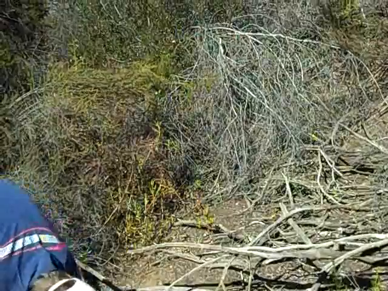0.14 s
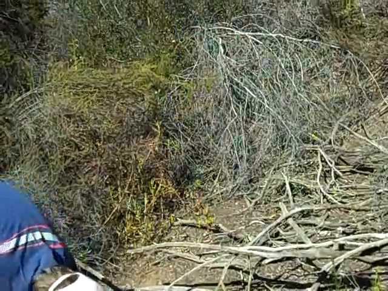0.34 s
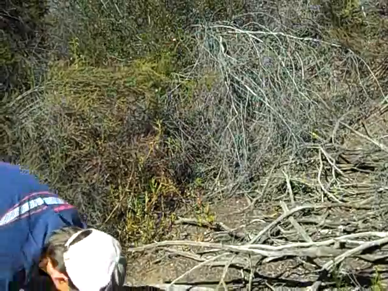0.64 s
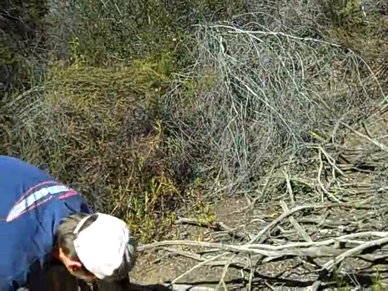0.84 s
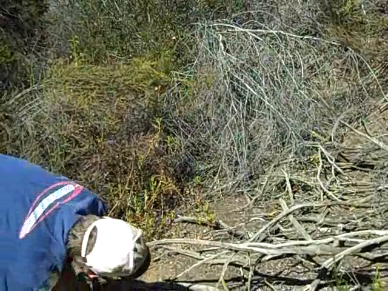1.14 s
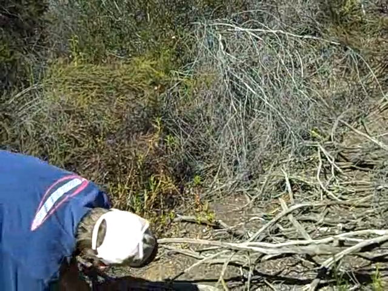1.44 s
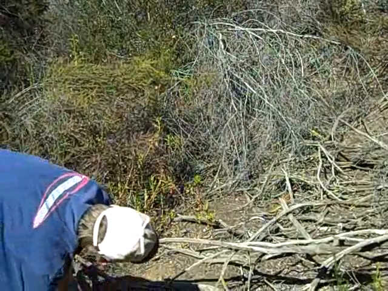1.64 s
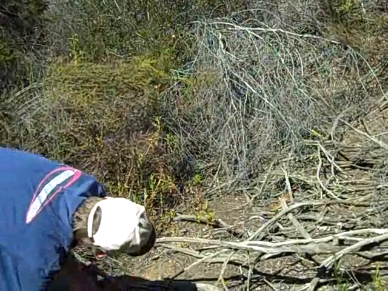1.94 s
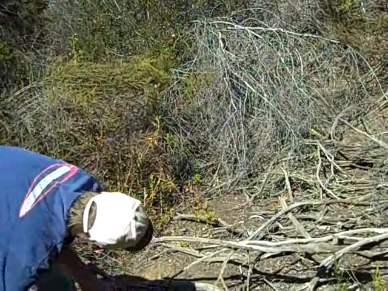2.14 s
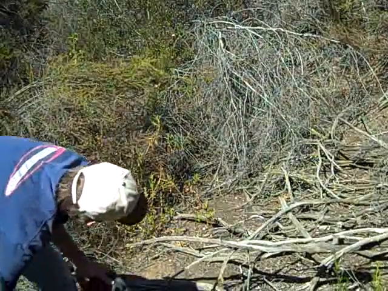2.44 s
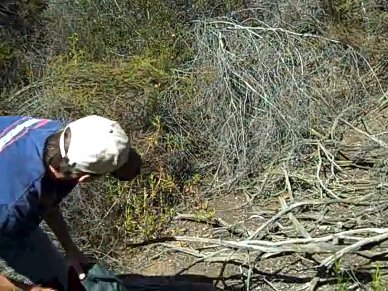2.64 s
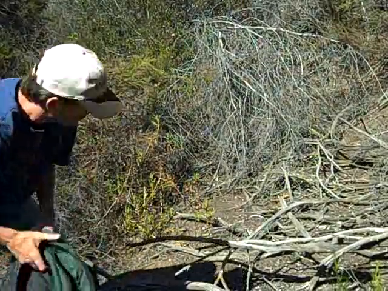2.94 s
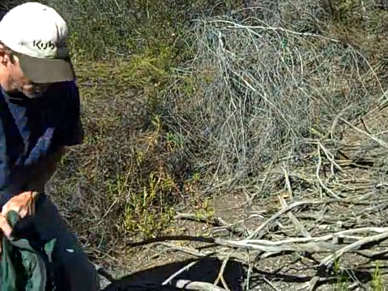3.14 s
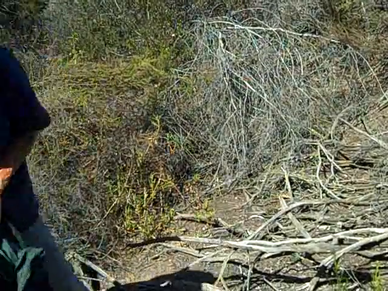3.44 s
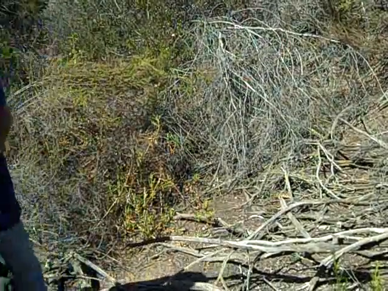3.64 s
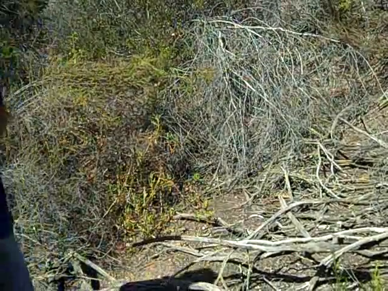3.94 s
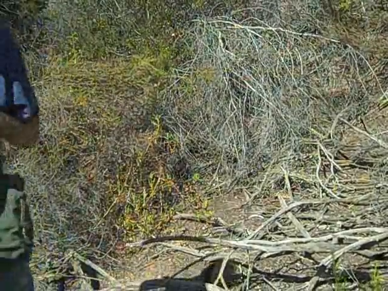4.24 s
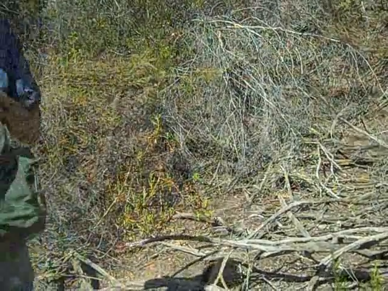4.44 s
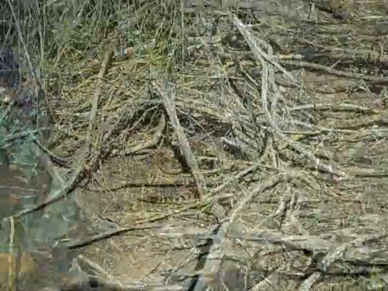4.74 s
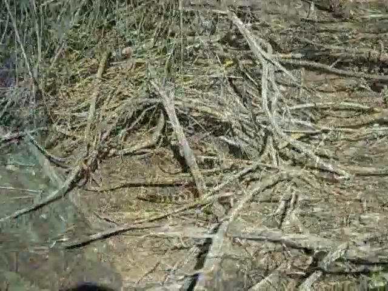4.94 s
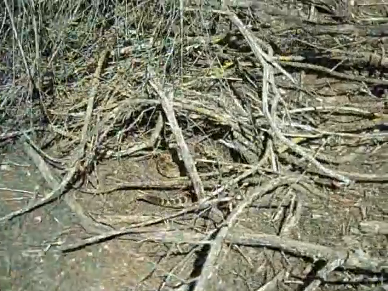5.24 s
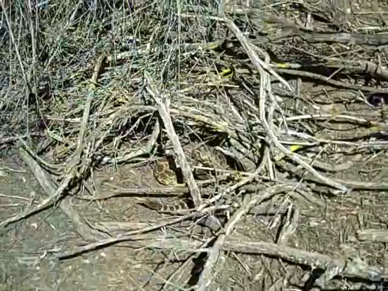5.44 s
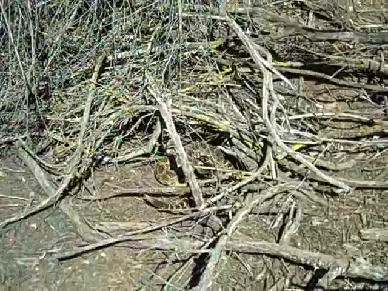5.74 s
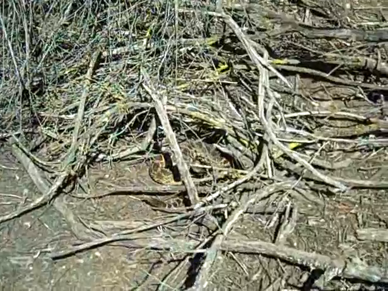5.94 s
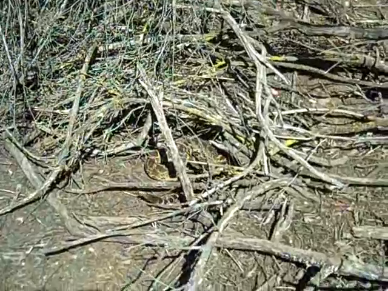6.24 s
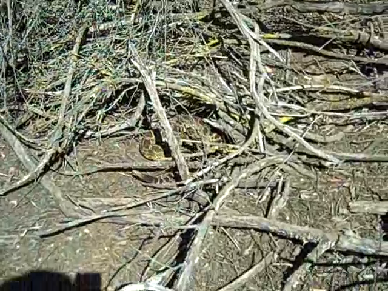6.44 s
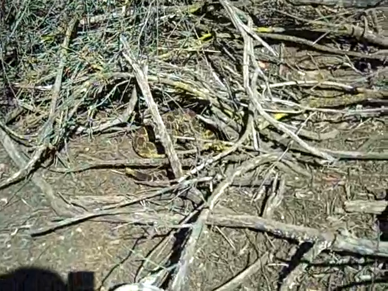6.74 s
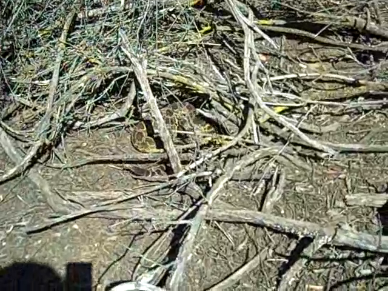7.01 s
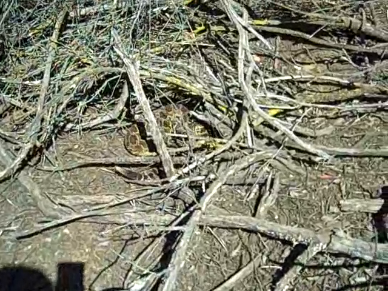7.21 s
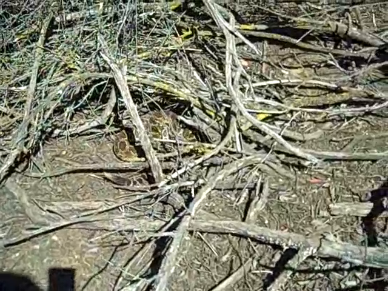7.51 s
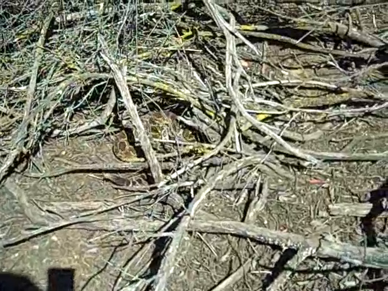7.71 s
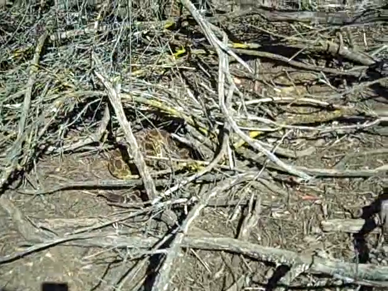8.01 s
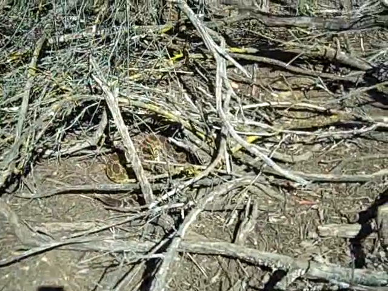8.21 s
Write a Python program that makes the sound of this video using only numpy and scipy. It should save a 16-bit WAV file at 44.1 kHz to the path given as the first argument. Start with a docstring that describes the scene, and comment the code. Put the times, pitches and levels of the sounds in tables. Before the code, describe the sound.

Continuous dry, high rattlesnake buzz outdoors, with scuffing feet, a hollow branch knock, and crackling twigs in the first half.

```python
"""Rattlesnake in dry scrub

A rattlesnake buzzes without pause under dead branches; halfway through, the microphone turns to face it.
At every swing of the tail the loose horny segments knock together: short runs of noise bursts, coloured by
the hollow segments. Someone close by shifts and steps back: litter scuffs in tiny grains, twigs snap in
noise and ringing modes, sticks and a branch knock, bark rasps and squeaks, all over faint outdoor air."""
import sys
import numpy as np
from scipy import signal
from scipy.fft import rfft, irfft
from scipy.io import wavfile

SR = 44100
rng = np.random.default_rng(int(sys.argv[2]) if len(sys.argv) > 2 else 0)


def log_audio(samples):
    """Write samples as a 16-bit WAV file to the path given in sys.argv[1]."""
    # one column per channel
    frames = np.atleast_2d(samples).T
    # limit to full scale, then quantise
    limited = np.clip(frames, -1, 1)
    pcm = np.round(limited * 32767).astype(np.int16)
    wavfile.write(sys.argv[1], SR, pcm)


N = 369116
TIME = np.arange(N) / SR

# outdoor air, outline of its spectral density: freq_hz, level_db (per Hz, relative)
AIR_COLOUR = [(20, 14), (50, -1.5), (120, -4), (300, -3.5), (700, -6), (1500, -7.5), (4000, 2), (13000, -6)]
# colour of the dry litter: freq_hz, level_db (relative)
LITTER_COLOUR = [(60, -18), (250, -11), (550, -2.5), (1400, -1.5), (2600, -3), (4500, -3.5), (12000, -22)]
# feet pressing and sliding in the litter: peak_s, level_db, rise_s, fall_s
FOOT_SCUFFS = [(1.19, -46.5, .025, 0.058), (1.52, -54, 0.17, .08), (1.815, -46, 0.063, 0.097),
               (2.03, -51.5, 0.12, 0.051), (3.4, -54.5, .3, 0.21), (3.58, -46.5, 0.066, 0.11),
               (3.87, -50, 0.083, 0.07), (4.24, -50, 0.11, 0.17), (4.55, -57.5, 0.12, 0.26)]
# colour of bark scraping on bark: freq_hz, level_db (relative)
BARK_COLOUR = [(300, -24), (800, -6.5), (1300, -1), (1600, -1), (2300, 1.5), (3200, -1), (4200, -1),
               (12000, -30)]
# sticks knocking on each other and on the ground: start_s, level_db, lowest_mode_hz, decay_s
STICK_KNOCKS = [(1.213, -42, 950, 0.0013), (2.027, -41.5, 596, 0.0012), (3.949, -43, 600, .0015),
                (4.141, -48.5, 375, .003), (4.465, -44, 625, .0023), (4.507, -30, 697, 0.0017),
                (6.942, -42, 685, 0.0024), (8.272, -41.5, 596, 0.0027)]
# modes of a dead stick: multiple_of_lowest_mode, level_db (relative)
STICK_MODES = [(1, 4), (1.4, -3), (2.2, -23)]
# modes of the thicker branch: freq_hz, level_db, decay_s
BRANCH_MODES = [(233, -42, 0.011), (855, -34.5, 0.006), (1190, -21.5, 0.0025), (1830, -24, 0.0023),
                (2180, -30, 0.0026), (2570, -31, .0028)]
# dry twigs snapping, and last the bright tick of the stick knock at 4.507 s: start_s, level_db, lowest_mode_hz,
# ring_db (relative), thud_db (relative), crack_length_s, crack_centre_hz
TWIG_SNAPS = [(1.344, -24, 3060, -10, -12, 0.0011, 6500), (1.55, -38, 2000, 4, -23, .0013, 3000),
              (3.552, -21.5, 1495, 1.5, -10, 0.0037, 8500), (3.573, -31, 1600, -12, -3, .0007, 2000),
              (3.84, -26.5, 894, -20, -10.5, 0.0027, 7500), (3.862, -29, 3120, 4, -31, 0.0023, 4200),
              (3.948, -37.5, 1870, 1, -25, .001, 2500), (4.218, -33.5, 4460, -5, -31, 0.0067, 6500),
              (4.235, -33, 3060, 2, -17, .0025, 4500), (4.241, -27.5, 4000, 2, -10, .0015, 4200),
              (4.32, -32.5, 2580, -12, -35, .005, 7000), (4.507, -34, 3000, -12, -32, 0.0033, 7000)]
# modes of a breaking twig: multiple_of_lowest_mode, level_db (relative)
TWIG_MODES = [(1, -2.5), (1.18, -6.5), (2.4, -1)]
# collisions within one stroke, from segment to segment: share_of_stroke, level_db (relative)
SEGMENT_COLLISIONS = [(0, 0), (.09, -.5), (.19, -1), (.28, 0), (.37, -.5), (.46, -.5), (.53, -3.5)]
# share of the buzz that arrives scattered by the brush: time_s, level_db (relative to direct)
SCATTERED_SHARE = [(0, -5), (4.4, -5), (5.4, -11), (8.37, -11)]
# broad colour of the hollow segments: freq_hz, level_db (relative)
SHELL_COLOUR = [(300, -24.5), (700, -26.5), (1500, -21), (2300, -16), (3600, -9.5), (4700, -4),
                (5700, -1.5), (7200, -3), (7700, -4), (10900, -4), (11800, -8), (13200, -9.5)]
# fixed narrow peaks and a dip in the buzz, as from a reflection off the ground:
# centre_hz, width_hz, height_db
BUZZ_PEAKS = [(4890, 350, 1), (5530, 250, 0.8), (6530, 300, 1.8), (7280, 260, 1.4), (7630, 350, -1),
              (8290, 500, 2.5), (9700, 600, 0.6), (10300, 810, 1)]
# loudness of the rattle at the microphone: time_s, level_db
RATTLE_LEVEL = [(0, -42.5), (.36, -42), (.62, -39.5), (1.15, -41.5), (1.35, -40.5), (2.95, -40), (3.6, -41),
                (4.5, -43.5), (5.0, -37), (5.6, -36), (7.25, -37), (8.37, -39.5)]
# the buzz's low flank: time_s, level_db (relative)
FLANK_LEVEL = [(0, -8), (.55, -10.5), (1.1, -9), (1.35, -12), (2.9, -7), (4.3, -7.5), (5.0, -9),
               (8.37, -8.5)]
# the treble dulls while the person bends and shifts close by: centre_s, half_length_s, depth_db
TREBLE_DULLINGS = [(.64, 0.24, 5.5), (1.437, 0.19, 4.5), (2.62, 0.39, 3), (5.25, 0.46, 1)]
# a band of the buzz wanders and grows stronger or weaker, as from a shifting ground reflection:
# time_s, centre_hz, gain_db
WANDERING_BAND = [(0, 5400, -1), (1.1, 5050, 3), (1.35, 6100, 0), (1.68, 6100, 6.5), (2.2, 5700, 1.5),
                  (3.45, 5230, 4), (4.15, 6050, 3), (5.1, 6300, -2.5), (5.8, 5800, 4), (8.37, 5770, 3)]

AIR_DB = -55.5
STIR_DB = -24  # litter stirred by the shaking tail, relative to the rattle
# a stick slips: its rasp swells and dies away
SLIP_S, RASP_DB, RASP_RISE_S, RASP_FALL_S = 1.62, -41.5, 0.068, 0.042
# near the height of the slip it squeaks at a falling pitch
SQUEAK_S, SQUEAK_HALF_S, SQUEAK_DB = 1.608, 0.014, -39
SQUEAK_HZ, SQUEAK_SAG_HZ_PER_S = 1660, 5900  # pitch at SQUEAK_S, and its fall
# a thicker branch is struck once, and bounces softly
BRANCH_S, BOUNCE_S, BOUNCE_DB = 1.1912, 0.00216, -16
# tail strokes per second, two to each full swing: the snake speeds up when alarmed, then slowly tires
WARY_RATE, ALARMED_RATE, TIRING_PER_S = 136.5, 140.3, 1.0
ALARM_S, ALARM_RISE_S = .35, .35
FLANK_TOP_HZ, TREBLE_BOTTOM_HZ = 5015, 8230  # the core of the buzz lies between
CORE_DB, TREBLE_DB = -2.0, -.6
# a reflection off the moving person thins one band, which slides down and settles
NOTCH_S, NOTCH_HALF_S, NOTCH_DEPTH_DB = 1.48, 0.48, 11
NOTCH_FROM_S, NOTCH_FROM_HZ, NOTCH_TO_HZ, NOTCH_SETTLE_S = 0.99, 6400, 4630, .35
TOP_HZ = 13260  # upper limit of the microphone's signal


def undb(db):
    """Decibels to gain."""
    return 10 ** (np.asarray(db) / 20)


def unit(x):
    """Scale to rms 1."""
    return x / np.sqrt(np.mean(x ** 2))


def curves(table):
    """Each column after the time as a value per sample."""
    s, *columns = np.transpose(table)
    return [np.interp(TIME, s, c) for c in columns]


def hump(s, half_s):
    """A smooth bell from 0 up to 1 and back, centred on time s."""
    return np.exp(-np.minimum(((TIME - s) / half_s) ** 2, 50))


def swell(s, rise_s, fall_s):
    """Grow exponentially to 1 at time s, then die away."""
    return np.exp(-np.minimum(np.maximum((s - TIME) / rise_s, (TIME - s) / fall_s), 50))


def colour(x, points, peaks=()):
    """Filter by an outline in Hz and dB with narrow peaks or dips on top; rms 1."""
    f = np.arange(N // 2 + 1) * SR / N + 1  # 1 Hz up, to keep the logarithm finite
    hz, db = np.transpose(points)
    shape = np.interp(np.log(f), np.log(hz), db)
    for centre, width, height in peaks:
        shape = shape + height / (1 + (2 * (f - centre) / width) ** 2)
    return unit(irfft(rfft(x) * undb(shape), N))


def below(x, hz, order=6):
    """Low-pass without delay."""
    return signal.sosfiltfilt(signal.butter(order, min(hz, .45 * SR), fs=SR, output="sos"), x)


def moving_band(x, hz, gain_db, width_hz, size=256):
    """Raise or lower a band that moves."""
    f, t, frames = signal.stft(x, SR, nperseg=size)
    centre_hz = np.interp(t, TIME, hz)
    bell = np.exp(-((f[:, None] - centre_hz) / width_hz) ** 2)
    bump_db = np.interp(t, TIME, gain_db) * bell
    return signal.istft(frames * undb(bump_db), SR, nperseg=size)[1][:N]


def linger(energy, decay_s):
    """Let energy die away exponentially (decay_s is that of the amplitude); mean 1."""
    energy = signal.lfilter([1], [1, -np.exp(-2 / (decay_s * SR))], energy)
    return energy / energy.mean()


def add(track, s, sound):
    """Mix a short sound in at time s."""
    start = int(s * SR)
    track[start:start + len(sound)] += sound[:N - start]


def outdoor_air():
    """Still air is a steady, faint noise, heaviest in the lows."""
    return undb(AIR_DB) * colour(rng.standard_normal(N), AIR_COLOUR)


def scuffs(grains_per_s=900, grit_db=-4, uneven_db=1.6):
    """Dry leaves and grit crunch underfoot and under the tail in dense tiny grains, catching and giving way."""
    grains = (rng.random(N) < grains_per_s / SR) * rng.standard_normal(N)
    crunch = unit(grains) + undb(grit_db) * rng.standard_normal(N)
    catch_db = uneven_db * unit(below(rng.standard_normal(N), 51, order=2))
    feet_power = sum((undb(db) * swell(s, rise_s, fall_s)) ** 2 for s, db, rise_s, fall_s in FOOT_SCUFFS)
    tail_power = undb(curves(RATTLE_LEVEL)[0] + STIR_DB) ** 2
    return colour(crunch, LITTER_COLOUR) * np.sqrt(feet_power + tail_power) * undb(catch_db)


def squeak(waver=0.0436):
    """Bark rasps on bark, and for a moment catches and slips at a falling, unsteady pitch."""
    hz = SQUEAK_HZ - SQUEAK_SAG_HZ_PER_S * (TIME - SQUEAK_S)
    hz = hz * (1 + waver * unit(below(rng.standard_normal(N), 300, order=2)))
    tone = np.sqrt(2) * np.sin(2 * np.pi * np.cumsum(hz) / SR) * hump(SQUEAK_S, SQUEAK_HALF_S)
    rasp = colour(rng.standard_normal(N), BARK_COLOUR) * swell(SLIP_S, RASP_RISE_S, RASP_FALL_S)
    return tone * undb(SQUEAK_DB) + rasp * undb(RASP_DB)


def knocks(contact_s=0.00037, brush_db=-23, brush_s=0.011):
    """Sticks ring for a few cycles; the brush around scatters a faint tail."""
    out, t = np.zeros(N), TIME[:SR // 10]
    onset = 1 - np.exp(-t / contact_s)
    for s, db, hz, decay_s in STICK_KNOCKS:
        modes = sum(undb(mode_db) * np.sin(2 * np.pi * hz * k * t) for k, mode_db in STICK_MODES)
        ring = modes * np.exp(-t / decay_s)
        tail = unit(below(rng.standard_normal(len(t)), 4.0 * hz, order=3)) * np.exp(-t / brush_s)
        add(out, s, undb(db) * (ring + undb(brush_db) * tail) * onset)
    return out


def branch(contact_s=0.00048, brush_db=-43, brush_s=0.013, brush_hz=2600):
    """A dead branch gives one compact, hollow knock; the brush around scatters a faint tail."""
    out, t = np.zeros(N), TIME[:SR // 10]
    ring = sum(undb(db) * np.sin(2 * np.pi * hz * t) * np.exp(-t / decay_s)
               for hz, db, decay_s in BRANCH_MODES)
    tail = undb(brush_db) * unit(below(rng.standard_normal(len(t)), brush_hz)) * np.exp(-t / brush_s)
    knock = (ring + tail) * (1 - np.exp(-t / contact_s))
    add(out, BRANCH_S, knock)
    add(out, BRANCH_S + BOUNCE_S, undb(BOUNCE_DB) * knock)
    return out


def snaps(splinter_db=-20, splinter_s=0.057, body_s=0.0014, swell_s=0.00019, thud_hz=200, spread=1.7):
    """A twig breaks with a crack, a short woody ring and a trail of splintering fibres; the same gives one
    stick knock its bright tick."""
    out, t = np.zeros(N), TIME[:SR // 10]
    # the freed end strikes the soil: a pulse that falls off above thud_hz
    thud = np.exp(-2 * np.pi * thud_hz * t)
    ring = np.exp(-t / body_s) * (1 - np.exp(-t / swell_s))
    for s, db, hz, body_db, thud_db, length_s, crack_hz in TWIG_SNAPS:
        body = ring * sum(undb(mode_db) * np.sin(2 * np.pi * hz * k * t) for k, mode_db in TWIG_MODES)
        tearing = np.exp(-(t / length_s) ** 2) + undb(splinter_db) * np.exp(-t / splinter_s)
        # the thinner the fibres, the brighter the crack
        edges_hz = [crack_hz / spread, min(crack_hz * spread, .45 * SR)]
        fibre = signal.butter(1, edges_hz, "band", fs=SR, output="sos")
        noise = np.sign(rng.standard_normal(len(t)))
        crack = unit(signal.sosfilt(fibre, noise)) * tearing
        add(out, s, undb(db) * (crack + undb(body_db) * body + undb(thud_db) * thud))
    return out


def stroke_rate():
    """The tail quickens in alarm, then slows steadily."""
    alarm = np.clip((TIME - ALARM_S) / ALARM_RISE_S, 0, 1)
    tired_s = np.maximum(TIME - ALARM_S - ALARM_RISE_S, 0)
    return WARY_RATE + (ALARMED_RATE - WARY_RATE) * alarm - TIRING_PER_S * tired_s


def clatter(ring_s=0.002, brush_s=0.02):
    """Each stroke sends a run of collisions down the rattle; each collision is a brief dry burst."""
    jitter = .025  # share of a stroke
    scatter_db, stroke_db, backstroke_db = 1.1, .3, -1.1
    phase = np.cumsum(stroke_rate()) / SR  # in strokes
    stroke = np.arange(int(phase[-1]))[:, None]
    share, db = np.transpose(SEGMENT_COLLISIONS)
    slip, force = rng.standard_normal((2, len(stroke), len(share)))
    at = np.searchsorted(phase, stroke + share + jitter * slip)
    # the swing back is a little weaker, and no two strokes are alike
    swing_db = backstroke_db * (stroke % 2 == 1) + stroke_db * rng.standard_normal(stroke.shape)
    strength = undb(db + scatter_db * force + swing_db)
    impacts = np.bincount(at.ravel(), strength.ravel() ** 2, N + 1)[:N]
    direct = linger(impacts, ring_s)
    # countless small echoes off twigs partly fill the gaps between strokes
    scattered = undb(curves(SCATTERED_SHARE)[0]) ** 2
    energy = (direct + scattered * linger(direct, brush_s)) / (1 + scattered)
    return np.sqrt(energy) * rng.standard_normal(N)


def rattlesnake():
    """The hollow segments colour the clatter; branches and bearing change how much of each flank arrives."""
    level_db, flank_db = curves(RATTLE_LEVEL)[0], curves(FLANK_LEVEL)[0]
    treble_db = TREBLE_DB - sum(depth_db * hump(s, half_s) for s, half_s, depth_db in TREBLE_DULLINGS)
    buzz = colour(clatter(), SHELL_COLOUR, BUZZ_PEAKS)
    flank = below(buzz, FLANK_TOP_HZ)
    treble = buzz - below(buzz, TREBLE_BOTTOM_HZ)
    core = buzz - flank - treble
    heard = undb(CORE_DB) * unit(core) + undb(flank_db) * unit(flank) + undb(treble_db) * unit(treble)
    settling = np.exp(-np.maximum(TIME - NOTCH_FROM_S, 0) / NOTCH_SETTLE_S)
    notch_hz = NOTCH_TO_HZ + (NOTCH_FROM_HZ - NOTCH_TO_HZ) * settling
    notch_db = -NOTCH_DEPTH_DB * hump(NOTCH_S, NOTCH_HALF_S)
    heard = moving_band(heard, notch_hz, notch_db, width_hz=320)
    return moving_band(heard, *curves(WANDERING_BAND), width_hz=430) * undb(level_db)


def scene():
    """Still air, footwork and snake, heard by one microphone."""
    footwork = scuffs() + squeak() + knocks() + branch() + snaps()
    return (outdoor_air() + footwork + rattlesnake())[None]


def record(dry):
    """The microphone's signal path cuts the top steeply."""
    top_cut = signal.firwin(601, TOP_HZ, fs=SR, window=("kaiser", 7))
    return signal.fftconvolve(dry, top_cut[None], mode="same")


dry = scene()
out = record(dry)
log_audio(out)
```